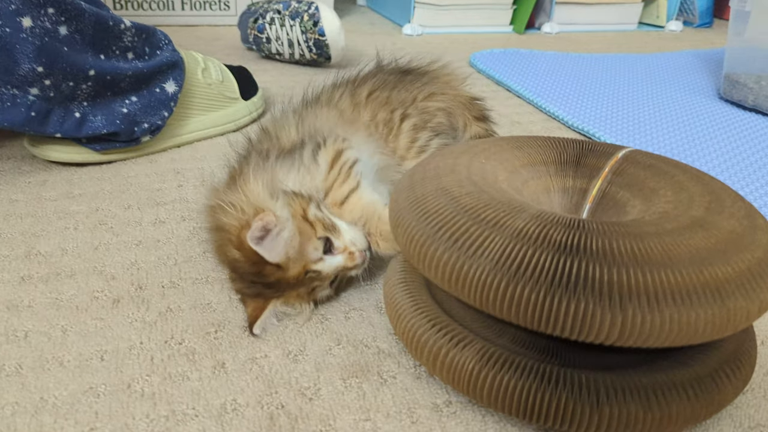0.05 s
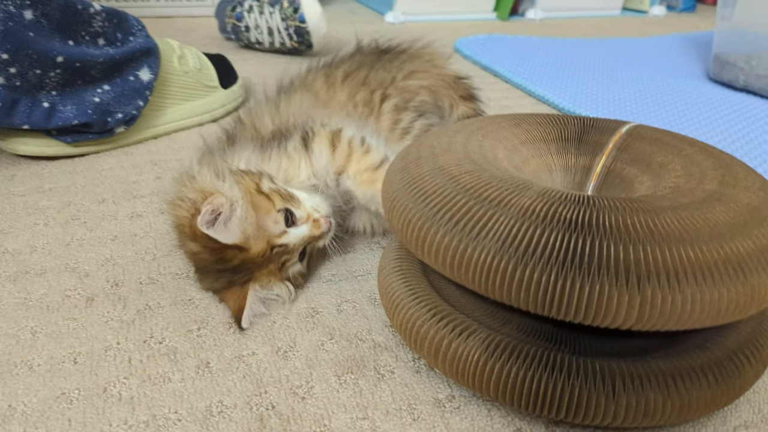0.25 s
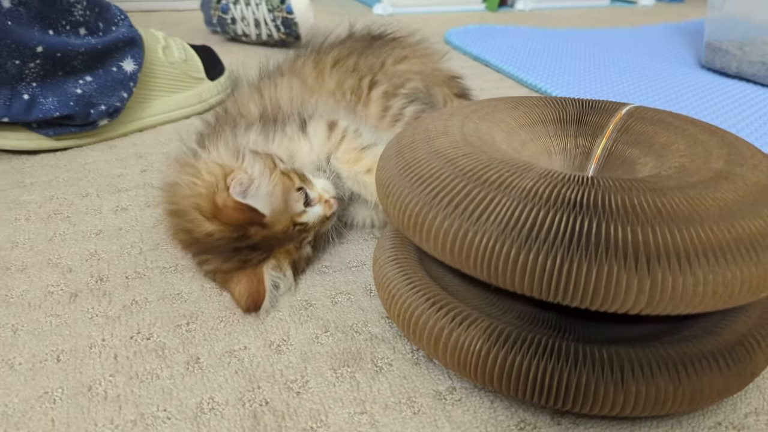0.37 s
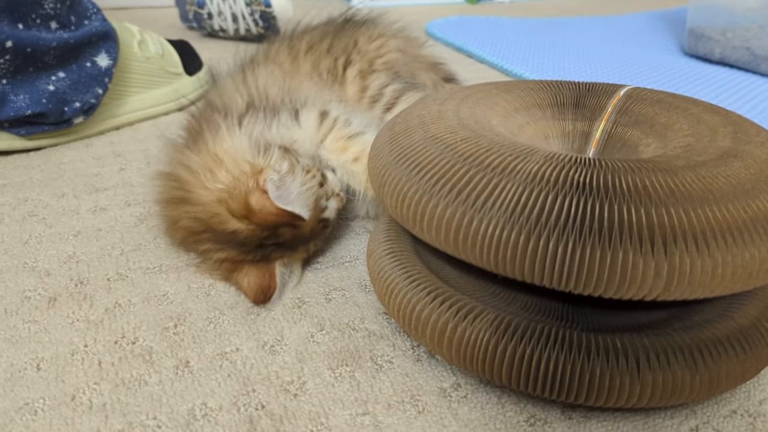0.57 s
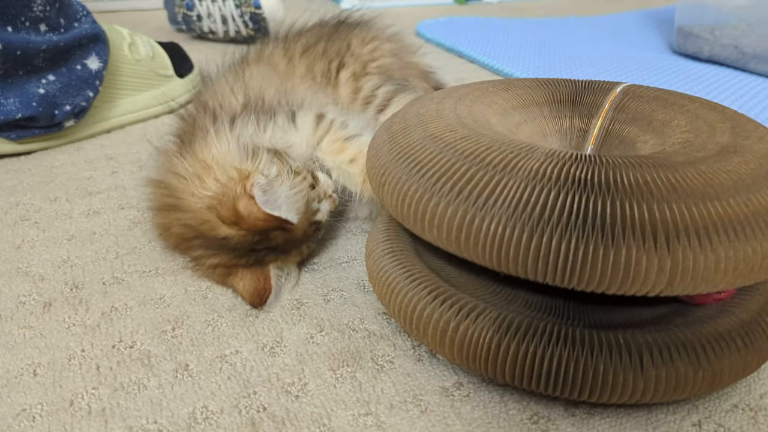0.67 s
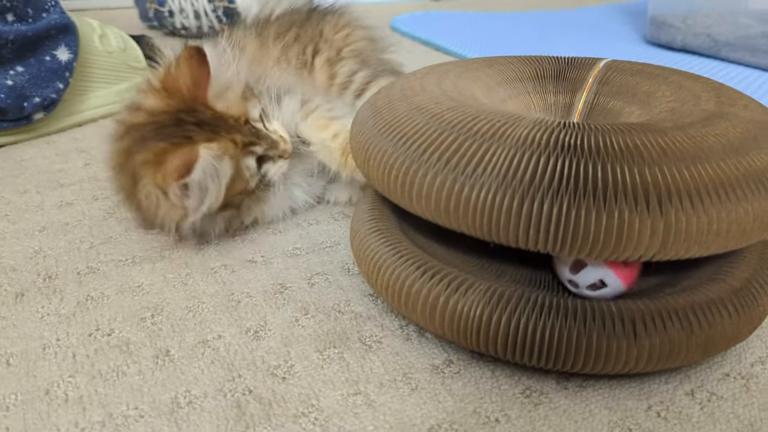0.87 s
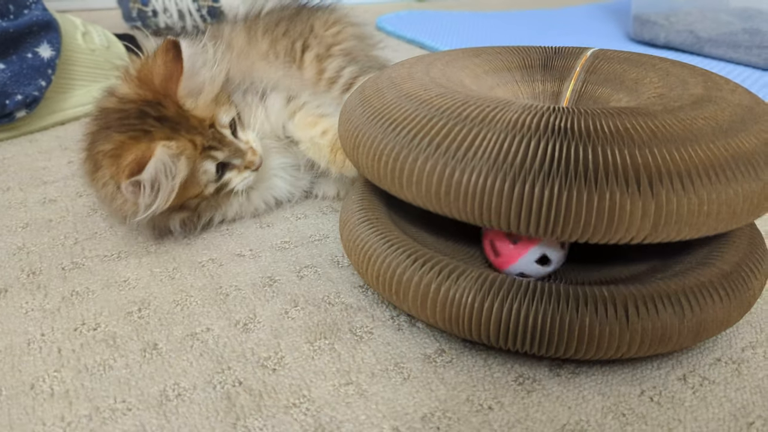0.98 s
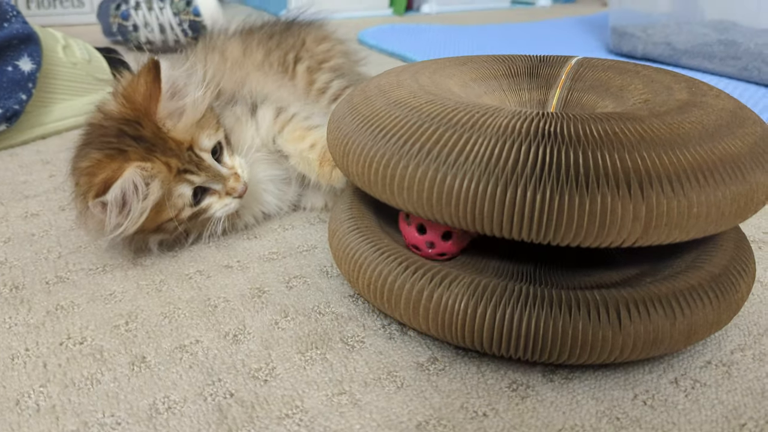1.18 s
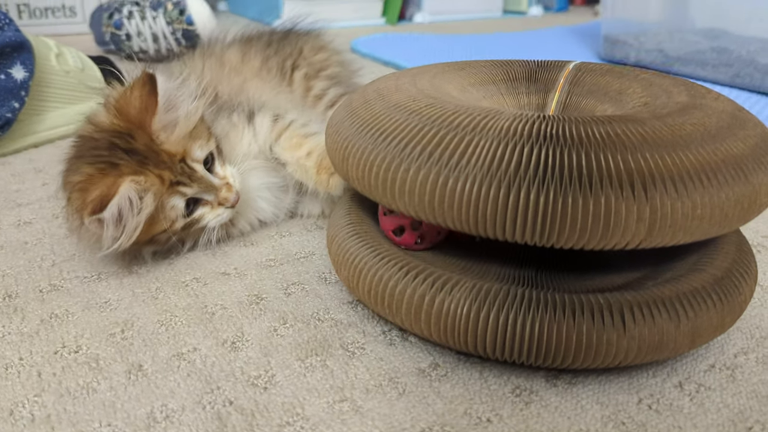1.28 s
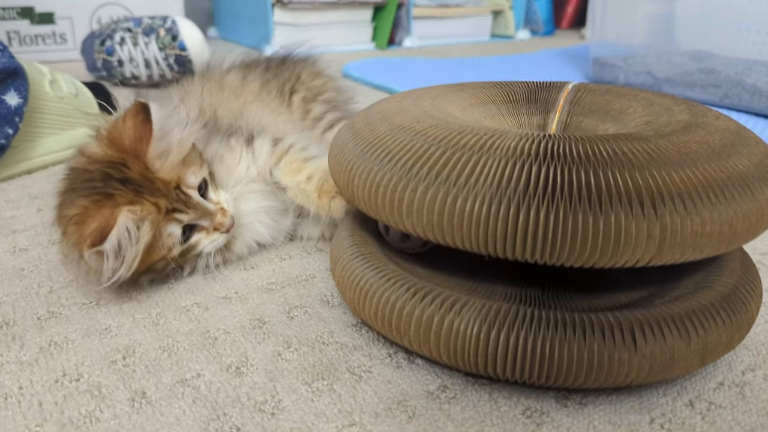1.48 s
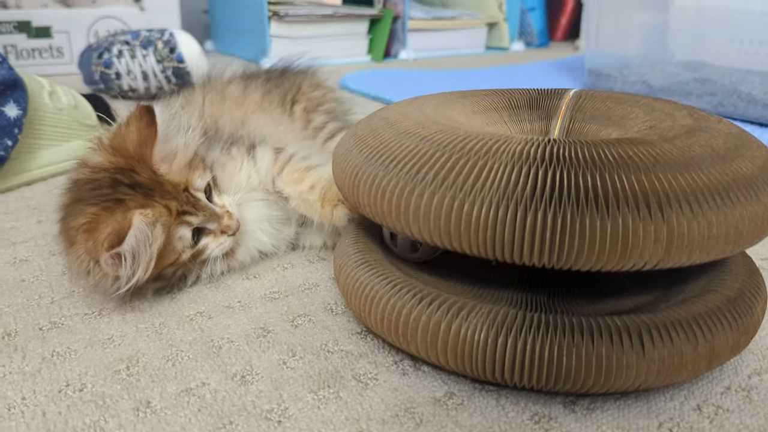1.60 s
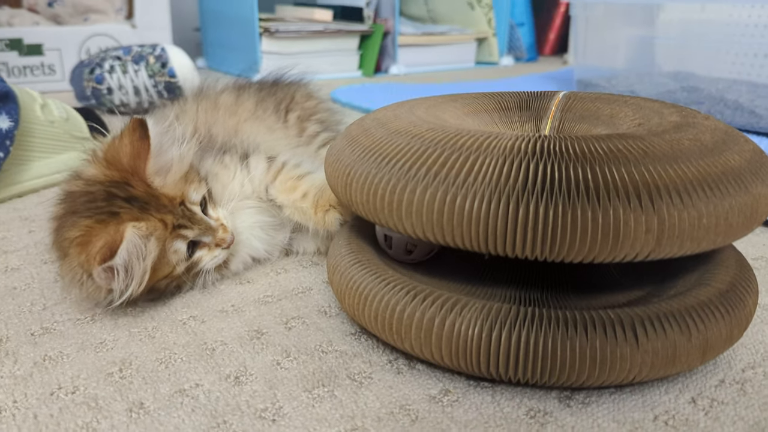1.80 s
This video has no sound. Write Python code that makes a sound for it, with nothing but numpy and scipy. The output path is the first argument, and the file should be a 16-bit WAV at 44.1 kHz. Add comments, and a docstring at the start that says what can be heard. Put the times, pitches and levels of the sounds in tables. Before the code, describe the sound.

A small bell ball jingles and rolls around a cardboard toy, swatted by a kitten.

```python
"""Kitten with a bell ball

A small carpeted room, close up on the two microphones of a hand-held phone. A kitten swats a plastic
ball with a small bell in it round the groove of a pleated cardboard toy. The pellet strikes and
skitters in the bell, the cage knocks, the ball bumps and rustles over the pleats, paws scuff the card."""
import sys
import numpy as np
from scipy import signal
from scipy.fft import rfft, irfft
from scipy.io import wavfile
from scipy.ndimage import uniform_filter1d

SR = 44100
rng = np.random.default_rng(int(sys.argv[2]) if len(sys.argv) > 2 else 0)


def inscribe(sig):
    """Save sig as 16-bit PCM at rate SR to the path in sys.argv[1].

    A 1-D sig is mono; a 2-D sig holds one channel per row.
    Samples are clipped to [-1, 1] before scaling.
    """
    pcm = np.round(np.clip(np.atleast_2d(sig).T, -1, 1) * 32767)
    wavfile.write(sys.argv[1], SR, pcm.astype(np.int16))


N = 81585
RING_N = 8192  # samples in one ring or echo
SWAT_ENDS_S, ROLL_ENDS_S = 0.48, 1.64


# The bell's modes in three groups: pitch_hz, level_db
LOW_MODES = [(5650, -13), (5980, -1), (6215, 0), (6330, -7), (6570, -1), (6770, -5)]
MIDDLE_MODES = [(7240, 0), (7460, -2), (7690, -3), (7900, -5), (8630, 0), (9180, -7)]
HIGH_MODES = [(9900, 0), (10350, -2), (10780, -1), (11300, -3), (13200, -3), (13850, -5), (15100, -3)]
GROUP_EDGES_HZ, GROUP_T60_S = (5500, 7000, 9500, 15800), (0.066, 0.043, 0.037)
LEAD_DB, MODE_SCATTER_DB, MIC_SPREAD_TURNS = 14, 4.5, 0.085

def ring(group, tuning, lead_hz):
    """One group of bell modes over the clash of pellet on shell; the spot struck favours one mode."""
    modes_hz, modes_db = np.array((LOW_MODES, MIDDLE_MODES, HIGH_MODES)[group]).T
    lo_hz, hi_hz = GROUP_EDGES_HZ[group:group + 2]
    apart = abs(modes_hz * tuning - lead_hz)
    modes_db = modes_db + LEAD_DB * (apart == apart.min()) * (lo_hz < lead_hz < hi_hz)
    t, tones = seconds(RING_N), 0
    for hz, db in zip(modes_hz, modes_db):
        strength, detune, phase, spread = rng.standard_normal(4)
        mic_phase = phase + MIC_SPREAD_TURNS * np.array([[spread], [0]])
        turns = hz * tuning * (1 + 0.0027 * detune) * t + mic_phase
        tones += undb(db + MODE_SCATTER_DB * strength) * np.sin(2 * np.pi * turns)
    tones = onset_unit(tones * fade(GROUP_T60_S[group]))
    clash = band(rng.standard_normal((2, RING_N)) * fade(t60_s=0.03), lo_hz, hi_hz, order=3)
    attack = 1 - np.exp(-t / 0.00018)  # the shell takes a moment to speak
    return onset_unit(attack * (tones + undb(-10) * onset_unit(clash)))


# Pellet strikes, close up: start_s, low_modes_db, middle_relative_db, high_relative_db, lead_hz
STRIKES = [(0.242, -28, -5.5, -16, 6280), (0.28, -41.5, 0.5, -12, 6040), (0.3182, -47.5, 9.5, -18, 7540),
           (.335, -32.5, -3.5, -16, 7340), (0.3825, -31, -3.5, -28, 6050), (0.416, -40, -0.5, -15, 7540),
           (0.499, -58, 11.5, -9, 7250), (0.5031, -46, 0.5, -8, 5980), (0.5705, -47.5, -3, -26, 6570),
           (0.634, -52, -8.5, -30, 6380), (.678, -58.5, -23, -19, 6215), (0.775, -55.5, -12, -23, 6570),
           (0.8569, -54, 5, -2, 7900), (0.8916, -57, 7.5, -1, 8630), (0.916, -55, 1, -8, 8630),
           (0.9538, -54, -1, 0, 8630), (0.9948, -56, 6.5, 0.5, 8630), (1.012, -58, -3, -2, 6215),
           (1.041, -51.5, 5, -11, 8630), (1.067, -58, 3.5, -3, 9180), (1.117, -61, 4, 3.5, 7255),
           (1.2142, -56, 4, -4.5, 7255), (1.3974, -76.5, 12.5, 18.5, 10780), (1.4355, -51, -3, -1, 6380),
           (1.5067, -47, -1, -5, 6570)]
# Tick of pellet on shell: frequency_hz, level_db
TICK_SPECTRUM = [(300, -18.5), (1000, 8), (2600, 0.5), (4500, 1.5), (6000, -8.5), (12000, 12.5),
                 (16000, -25.5)]

def bell():
    """Each strike of the pellet is a sharp tick and a short, damped ring."""
    out = np.zeros((2, N))
    usual_db = np.mean([row[1] for row in STRIKES])
    for at, db, middle_db, high_db, lead_hz in STRIKES:
        tuning = 1.014 if at < SWAT_ENDS_S else 1
        tone = sum(g * ring(k, tuning, lead_hz) for k, g in enumerate(undb([0, middle_db, high_db])))
        tick = onset_unit(noise(TICK_SPECTRUM, RING_N) * fade(t60_s=0.014))
        tick_db = -13 + 0.25 * (db - usual_db)  # harder strikes tick more
        add(out, at, undb(db) * (tone + undb(tick_db) * tick))
    return out


# The pellet loose in the rolling ball: time_s, level_db
SKITTER_LEVELS = [(0, -75), (.19, -77), (.26, -46.5), (.42, -49.5), (.47, -104), (.52, -43.5), (.6, -59),
                  (.7, -61), (.84, -81.5), (.93, -55), (.985, -84), (1.03, -54), (1.1, -63), (1.24, -60),
                  (1.35, -72), (1.46, -66.5), (1.55, -74.5), (1.85, -110)]
SKITTER_PER_S, TURN_S, TURN_DB = 530, 0.075, 7
CAGE_HZ = [3620, 3820, 4480, 4950]

def skitter():
    """The pellet tumbles against spots of the shell, each with its own lead mode, and stirs the cage."""
    out, spots = 0, LOW_MODES[1:] + MIDDLE_MODES
    for lead_hz, _ in spots:
        # as the ball turns, each spot comes and goes
        turning = unit(band(rng.standard_normal(N), 0.12 / TURN_S, 0.5 / TURN_S))
        hits = taps(SKITTER_PER_S / len(spots), scatter_db=4) * undb(TURN_DB * turning)
        force = unit(hits) * curve(SKITTER_LEVELS)
        tone = sum(g * ring(k, 1, lead_hz) for k, g in enumerate(undb([0, -1, -2.5])))
        tone += undb(-18) * resonance(CAGE_HZ, t60_s=0.062)
        out += signal.fftconvolve(force[None], tone / np.linalg.norm(tone[1]))[:, :N]
    return out / np.sqrt(len(spots))


# Knocks of the ball's cage, close up: start_s, level_db, pitch_hz, t60_s
KNOCKS = [(0.242, -48.5, 1110, 0.0039), (0.2479, -37.5, 1230, 0.01), (0.2646, -38, 2623, 0.05),
          (0.2701, -41, 1470, 0.0063), (0.281, -43, 1065, .01), (0.3162, -44, 520, 0.03),
          (0.3206, -44, 794, 0.0078), (0.349, -45, 1960, 0.018), (0.382, -47.5, 2580, 0.0029),
          (0.5053, -48, 1510, 0.0078), (0.54, -53, 2110, 0.0094), (1.5074, -46.5, 1010, 0.0081),
          (1.5269, -65, 950, .012)]
HOLLOW_HZ = [476, 710, 918, 1334, 2580, 2460]

def knocks():
    """The plastic cage clacks against claws and card; during the swat the hollow toy rings too."""
    out, t = np.zeros(N), seconds(RING_N)
    for at, db, hz, t60_s in KNOCKS:
        crack = rng.standard_normal(RING_N) * fade(t60_s)
        snap = undb(1.5) * np.linalg.norm(crack) * (t == 0)
        body = band(snap + crack, hz / 1.53, hz * 2.02)
        shell = np.sin(2 * np.pi * hz * t) * fade(t60_s)
        parts = ((0, body), (-12, crack), (-1, shell))
        clack = sum(undb(part_db) * onset_unit(part, count=130) for part_db, part in parts)
        hollow = undb(-9) * resonance(HOLLOW_HZ, t60_s=0.032)
        add(out, at, undb(db) * (clack + (at < SWAT_ENDS_S) * hollow))
    return out


# The ball crossing the pleats of the groove: start_s, relative_level_db
BUMPS = [(0.1311, -61), (0.206, -53.5), (0.3928, -50), (0.404, -43), (0.4171, -41.5), (0.4663, -42),
         (0.5023, -41.5), (0.5306, -43), (0.556, -47), (0.597, -52.5), (0.606, -46), (0.6145, -44.5),
         (.6231, -51), (0.6445, -46.5), (0.6543, -46), (0.6686, -50), (0.6844, -57.5), (0.7613, -49),
         (0.7722, -47), (0.7829, -49.5), (0.889, -50.5), (0.9781, -62), (1.022, -51.5), (1.031, -47),
         (1.04, -50.5), (1.048, -51), (1.055, -63), (1.2215, -56), (1.495, -54), (1.5945, -55),
         (1.6333, -58.5)]
PATTER_PER_S, CONTACT_S, CARD_HZ = 56, 0.00033, 458

def bumps():
    """Soft pushes with a dead cardboard ring; they reach the two microphones in opposite polarity."""
    patter = taps(PATTER_PER_S, scatter_db=2.9) * (seconds() < ROLL_ENDS_S)
    blows = undb(-1.5) * curve(ROLL_LEVELS) * patter  # faint bumps between the main ones
    for at, db in BUMPS:
        add(blows, at, undb([db]))
    t = seconds(201)
    contact = np.exp(-((t - t.mean()) / CONTACT_S) ** 2 / 2)
    push = undb(13.5) * signal.fftconvolve(blows, contact, "same")
    card = np.cos(2 * np.pi * CARD_HZ * seconds(RING_N)) * fade(t60_s=0.016)
    card_ring = signal.fftconvolve(push, card)[:N] * 2 * np.pi * CARD_HZ / SR
    thud = band(push + 0.13 * card_ring, 61.4, 8000, order=1)
    return np.array([-undb(-12) * delay(thud, lag_s=0.00048), thud])


# Short paw scuffs on the card, then the rolling ball's long rustle: centre_s, half_length_s, level_db
CARD_RUBS = [(0.031, 0.026, -60), (0.214, 0.0076, -49.5), (.265, 0.016, -39.5), (0.329, 0.028, -48.5),
             (0.415, 0.018, -47), (0.557, 0.061, -59.5), (0.595, 0.0099, -52), (0.795, 0.017, -64),
             (1.1, 0.23, -78.5)]
# Hiss of rubbed card: frequency_hz, level_db
RUB_SPECTRUM = [(200, -10), (700, -2), (1400, -3.5), (1850, -4.5), (2500, 0), (3900, -8.5), (8300, 0),
                (11000, -6.5), (16000, -10)]
GRAIN_DB = 4.5

def card_rubs():
    """Grainy friction on the pleats: brief strokes of fur and claws, a faint rustle from the ball."""
    roughness = unit(uniform_filter1d(rng.standard_normal(N), size=70))
    grain = unit(undb(GRAIN_DB * roughness))
    return swells(CARD_RUBS) * grain * noise(RUB_SPECTRUM)


# A claw catching a pleat: centre_s, half_length_s, level_db
RASPS = [(.0975, .003, -53.5), (.177, 0.011, -55)]
PLEAT_HZ, SLIPS_PER_S = [1990, 2140, 2460, 2943], 900

def rasps():
    """A claw sticks and slips on the edge of a pleat, which rings with a pitched rasp amid hiss."""
    slips = taps(SLIPS_PER_S, GRAIN_DB)
    pleat = unit(signal.fftconvolve(slips, resonance(PLEAT_HZ, t60_s=0.025))[:N])
    return swells(RASPS) * (pleat + noise(RUB_SPECTRUM))


# The toy's body under the rolling ball, and handling noise on the phone: time_s, level_db
ROLL_LEVELS = [(0, -66.5), (.11, -76), (.16, -56), (.25, -63), (.34, -52), (.45, -63), (.64, -52.5),
               (.71, -59.5), (.98, -57.5), (1.05, -53.5), (1.1, -69), (1.24, -62.5), (1.5, -63.5),
               (1.85, -71)]
HANDLING_LEVELS = [(0, -62), (.3, -54), (.7, -57), (1.14, -60), (1.229, -48.5), (1.319, -54), (1.701, -61),
                   (1.761, -46), (1.85, -60)]
# The same two rumbles at the microphones: frequency_hz, level_db
ROLL_SPECTRUM = [(50, -15.5), (112, 4), (160, -10), (550, -16.5), (1200, -29), (2800, -43.5),
                 (16000, -51.5)]
HANDLING_SPECTRUM = [(35, 0), (60, -5), (1000, -100)]

def rumble(spectrum, levels, opposed=0.17):
    """Low noise of rolling or handling, partly opposed between the microphones."""
    right = noise(spectrum)
    left = np.sqrt(1 - opposed ** 2) * noise(spectrum) - opposed * right
    return curve(levels) * np.array([undb(0.5) * left, right])


def room(x):
    """Close reflections from the toy and floor, then the room's short tail, at one microphone."""
    out = 0
    for db, t60_s, build_s in ((-11, 0.035, 0.002), (-18.5, 0.17, 0.012)):
        build = 1 - np.exp(-seconds(RING_N) / build_s)
        echo = rng.standard_normal(RING_N) * fade(t60_s) * build
        out += undb(db) * signal.fftconvolve(x, echo / np.linalg.norm(echo))[:N]
    return out


def undb(db):
    return 10 ** (np.asarray(db) / 20)


def unit(x):
    return x / np.sqrt(np.mean(x ** 2) + 1e-30)


def onset_unit(x, count=350):
    """Scale a blow so that its first samples have rms 1."""
    return x / np.sqrt(np.mean(x[..., :count] ** 2))


def seconds(count=N):
    return np.arange(count) / SR


def fade(t60_s):
    return np.exp(-np.log(1000) * seconds(RING_N) / t60_s)


def curve(rows):
    """Gain over time through (time_s, level_db) points."""
    return undb(np.interp(seconds(), *np.array(rows).T))


def swells(rows):
    """Gain over time of smooth, Gaussian swells."""
    return sum(undb(db) * np.exp(-((seconds() - at) / half) ** 2 / 2) for at, half, db in rows)


def noise(spectrum, count=N):
    """Noise shaped by (frequency_hz, level_db) points, rms 1."""
    hz, db = np.array(spectrum).T
    bins_hz = np.maximum(np.fft.rfftfreq(count, 1 / SR), 1)
    gain = undb(np.interp(np.log(bins_hz), np.log(hz), db))
    return unit(irfft(rfft(rng.standard_normal(count)) * gain, count))


def taps(per_s, scatter_db):
    """Random impulses of uneven size."""
    return (rng.random(N) < per_s / SR) * undb(scatter_db * np.clip(rng.standard_normal(N), -2, 2))


def resonance(modes_hz, t60_s):
    """A few equal modes that die away together."""
    tones = sum(np.sin(2 * np.pi * (hz * seconds(RING_N) + rng.random())) for hz in modes_hz)
    return onset_unit(tones * fade(t60_s))


def band(x, lo_hz, hi_hz, order=2):
    return signal.sosfilt(signal.butter(order, [lo_hz, hi_hz], "band", fs=SR, output="sos"), x)


def delay(x, lag_s):
    return irfft(rfft(x) * np.exp(-2j * np.pi * np.fft.rfftfreq(N, 1 / SR) * lag_s), N)


def add(out, at_s, x):
    start = int(at_s * SR)
    out[..., start:start + x.shape[-1]] += x[..., :N - start]


def scene():
    """The toy lies close by, a little to the right; the left microphone is weaker but brighter."""
    left, right = bell() + skitter() + knocks() + card_rubs() + rasps()
    treble = band(left, 13000, 14000, order=1)
    left = delay(undb(-4.5) * left + undb(-8) * treble, lag_s=0.000035)
    airborne = np.array([left + room(left), right + room(right)])
    rolling = rumble(ROLL_SPECTRUM, ROLL_LEVELS)
    handling = rumble(HANDLING_SPECTRUM, HANDLING_LEVELS)
    thuds = bumps()
    hiss = undb(-101.5) * rng.standard_normal((2, N))
    return airborne + thuds + rolling + handling + hiss


def record(dry):
    """The phone cuts the treble steeply above 15.9 kHz."""
    return signal.sosfilt(signal.ellip(10, 0.2, 80, 15900, fs=SR, output="sos"), dry)


dry = scene()
out = record(dry)
inscribe(out)
```